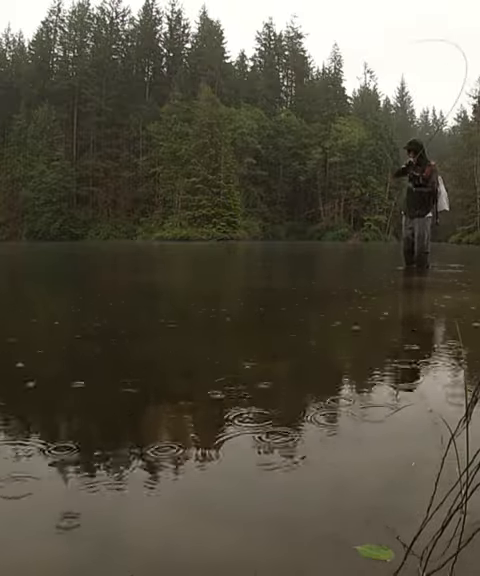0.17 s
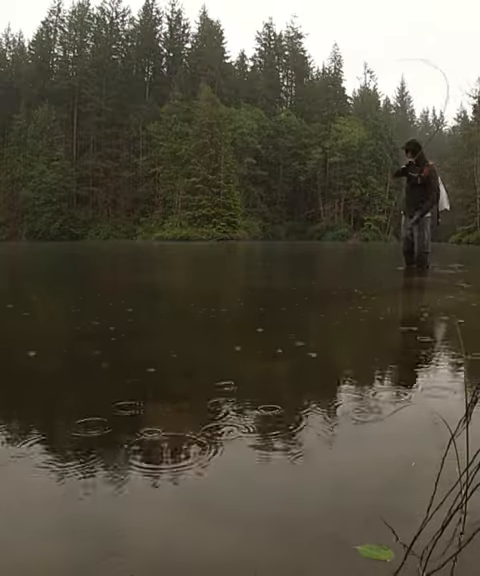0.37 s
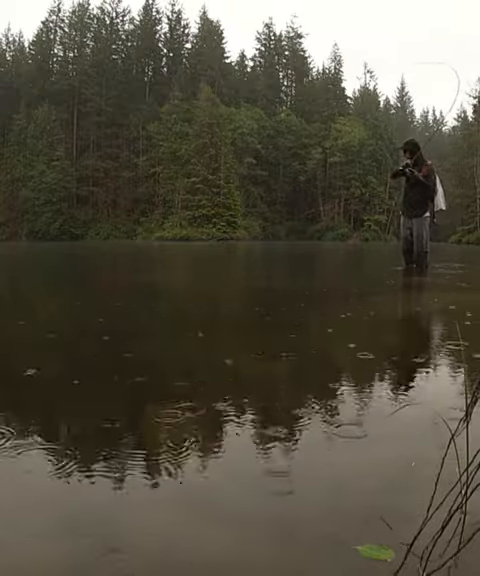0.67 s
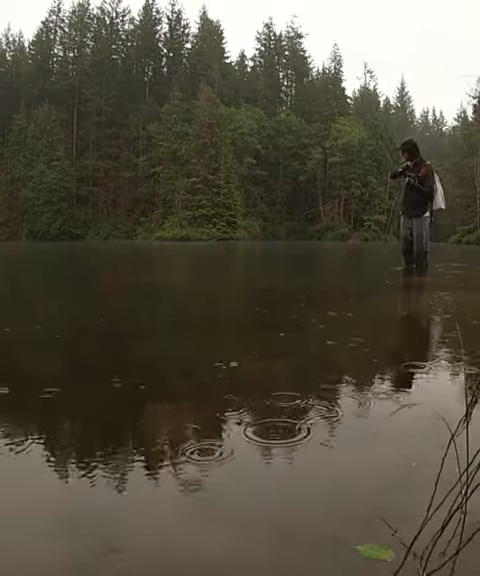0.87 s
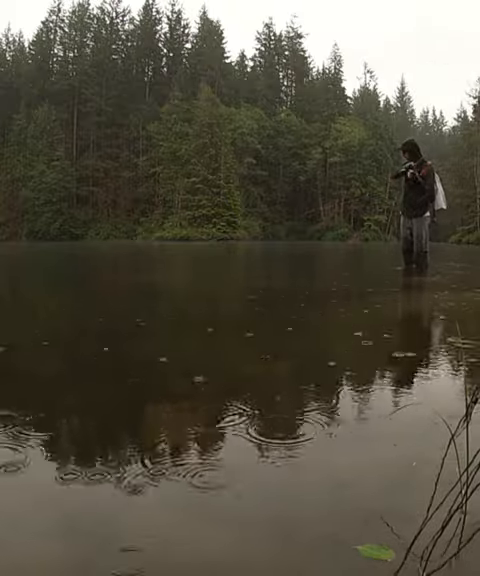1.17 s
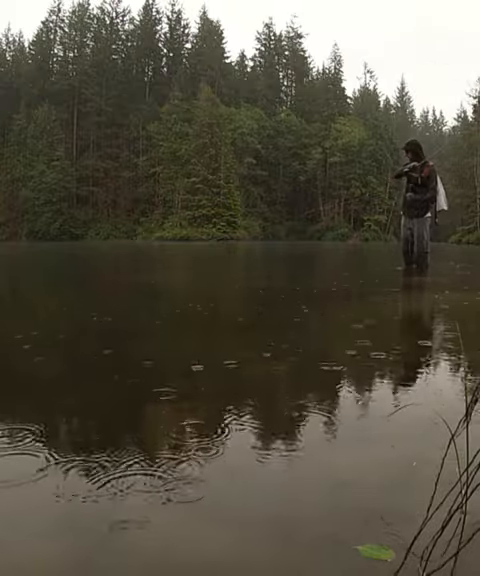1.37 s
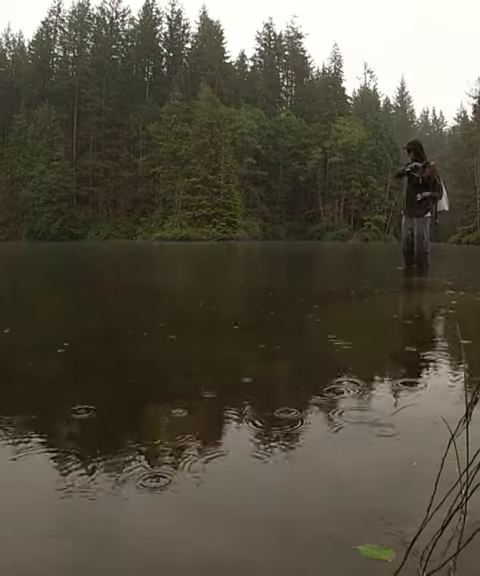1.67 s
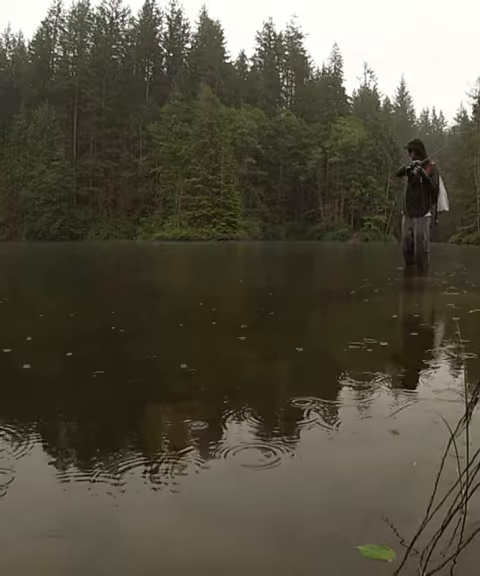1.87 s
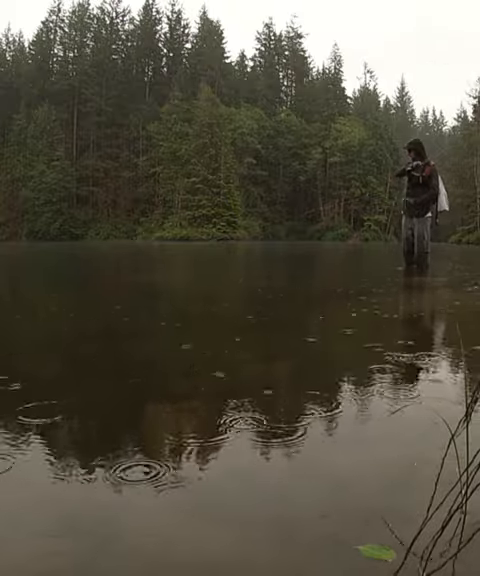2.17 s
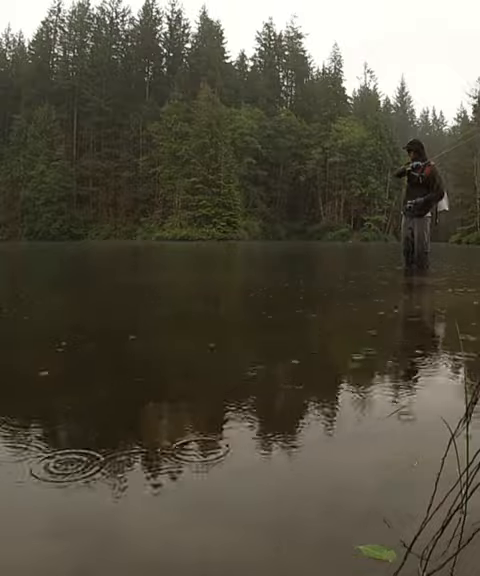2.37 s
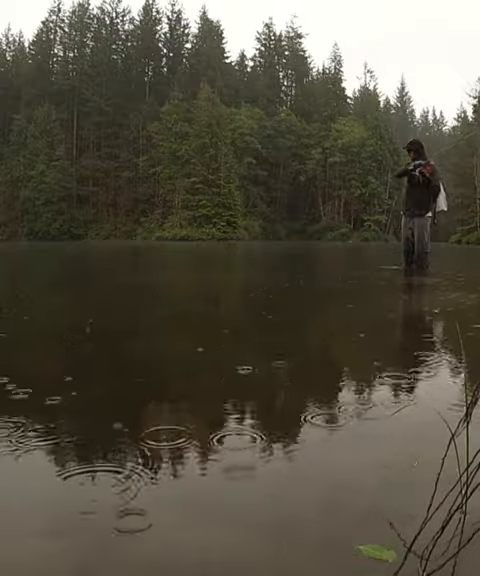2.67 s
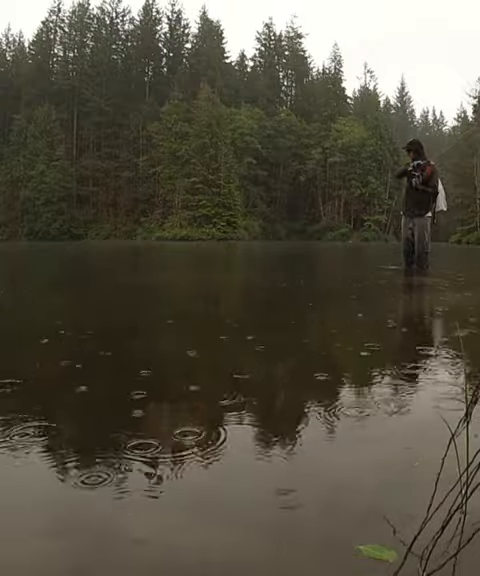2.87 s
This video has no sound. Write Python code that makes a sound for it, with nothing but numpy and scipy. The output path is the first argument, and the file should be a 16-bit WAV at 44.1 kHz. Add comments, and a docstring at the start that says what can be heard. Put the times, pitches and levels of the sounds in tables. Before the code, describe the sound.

Wet fishing line rasps and zips through rod rings in bursts beside a quiet rainy lake

```python
"""Wet fly line is pulled through the rings of a fishing rod, by a forest lake in light rain.
The line sticks and slips: each slip rings the rod, so single slips tick and quick runs creak.
As it slides it also hisses: shaped noise with narrow whistles. A songbird's gliding near-sines echo.
Below lie a rumble and far rain (noise), a faint low tone, chirping small drops and one big plop."""
import sys
import numpy as np
from scipy import signal
from scipy.io import wavfile
from scipy.ndimage import uniform_filter1d

SR = 44100
rng = np.random.default_rng(int(sys.argv[2]) if len(sys.argv) > 2 else 0)


def nominal_scale(level):
    """Amplitude ratio for a level in decibels (scalar or array-like)."""
    x = np.asarray(level, float) / 20
    return 10 ** x


def persist_wave(psi):
    """Save psi, clipped to +-1, as 16-bit WAV."""
    counts = np.round(np.clip(psi, -1, 1) * 32767).astype(np.int16)
    wavfile.write(sys.argv[1], SR, np.atleast_2d(counts).T)


N = 133623  # length in samples
USUAL_RATE = 300  # slips per second at which the rod rings at its plain pitch


def read(points, hz):
    """Reads a curve at any frequency, on a logarithmic frequency scale."""
    f, value = np.transpose(points)
    return np.interp(np.log(hz + 1), np.log(f + 1), value)


def evened(x):
    """Scales to an rms of 1."""
    return x / np.sqrt(np.mean(x ** 2) + 1e-20)


def wander(count, size):
    """A smooth random drift of rms 1; a larger size (samples) drifts more slowly."""
    return evened(uniform_filter1d(rng.standard_normal(count), size))


def add(mix, s, sound):
    """Adds a sound to the mix at s seconds, cut off at the end of the mix."""
    part = mix[..., round(s * SR):][..., :sound.shape[-1]]
    part += sound[..., :part.shape[-1]]


def noise(shape, same, patchy_db, flicker_db, size):
    """Two-channel noise of a spectrum, with drifting patches and a flicker shared by all bins."""
    frames, hz = 4 * N // size + 5, np.fft.rfftfreq(size, 1 / SR)
    a, b, c, d, patches = rng.standard_normal((frames, len(hz), 5)).T
    patches = uniform_filter1d(patches, size=8, axis=0)
    patches = evened(uniform_filter1d(patches, size=8, axis=1))
    same = np.clip(read(same, hz), -1, 1)[:, None]
    left = a + 1j * b
    right = same * left + np.sqrt(1 - same ** 2) * (c + 1j * d)
    flicker = flicker_db * rng.standard_normal(frames)
    z = np.array([left, right]) * nominal_scale(read(shape, hz)[:, None] + patchy_db * patches + flicker)
    return evened(signal.istft(z, nperseg=size, noverlap=3 * size // 4)[1][:, :N])


def tail(x, t60):
    """A diffuse echo, unrelated left and right, of energy about 1; t60 is its fade by 60 dB in s."""
    h = rng.standard_normal((2, SR)) * nominal_scale(-60 * np.arange(SR) / SR / t60)
    return signal.fftconvolve(x[None], h / np.linalg.norm(h[0]), axes=1)[:, :N]


def whistle(top_s, db, pitch, waver):
    """A near sine along its pitch curve, swelling to its loudest moment."""
    start_db, end_db = -11, -5.5  # against the loudest moment
    s, hz = np.transpose(pitch)
    t = np.arange(s[0], s[-1], 1 / SR)
    glide = uniform_filter1d(np.interp(t, s, hz), size=150)
    phase = 2 * np.pi * np.cumsum(glide * (1 + waver * wander(len(t), size=300))) / SR
    ends = np.clip(np.minimum(t - s[0], s[-1] - t) / .009, 0, 1)  # 9 ms fades
    swell_db = np.interp(t, (s[0], top_s, s[-1]), (start_db, 0, end_db))
    level = nominal_scale(db + swell_db + 2.4 * wander(len(t), size=500))
    return s[0], np.sqrt(2) * ends * level * np.sin(phase)


# how alike left and right are in the air noise: (f/Hz, likeness from 0 to 1)
AIR_LIKENESS = [(150, 0.98), (500, 0.83), (3770, 0.71), (15000, 0.53)]
# spectrum of rumble and far rain: (f/Hz, relative level/dB per Hz)
AIR_SPECTRUM = [(32, 0), (100, -8), (170, -11.5), (340, -25.5), (520, -39), (1900, -45.5), (4000, -45),
                (5600, -41), (9000, -57.5), (12200, -58.5), (15500, -72)]


def air():
    """Rumble and far rain: noise that is strongest in the bass."""
    return nominal_scale(-33) * noise(AIR_SPECTRUM, AIR_LIKENESS, patchy_db=0.85, flicker_db=2.6, size=2048)


# a faint low tone: (loudest at t/s, rms level/dB there before small drifts, pitch curve [(t/s, f/Hz)])
LOW_TONE = (0.015, -51.5, [(0, 465.7), (.45, 447.4)])


def hum():
    """One faint, slightly falling low tone with an unsteady pitch."""
    x = np.zeros(N)
    add(x, *whistle(*LOW_TONE, 0.068))
    return x


def drops():
    """Small drops as short fading chirps, each with its own pitch, loudness and place."""
    per_s, quietest_db, low_hz, high_hz = 120, -66, 3000, 9000  # quietest: before placing left or right
    x, t = np.zeros((2, N)), np.arange(400) / SR
    for when, high, size, place in rng.random((round(per_s * N / SR), 4)):
        turns = low_hz * (high_hz / low_hz) ** high * t
        chirp = np.exp(-turns / 3.0) * np.sin(2 * np.pi * turns)  # higher drops fade sooner
        level = nominal_scale(quietest_db - 4.5 * np.log(size + .03))  # a few are much louder
        add(x, when * N / SR, level * np.outer([1.5 - place, .5 + place], chirp))
    return x


# what the rod and rings ring with, before each slip varies it: (f/Hz, relative level/dB)
ROD_MODES = [(1000, -0.5), (1550, 5), (2150, 8), (2700, 1), (4250, -1.5), (5200, -5), (7200, -14.5),
             (10500, -28)]


def slip(db, bright_db, rate=USUAL_RATE, rough=1):
    """One jerk of the line rings the rod, a little differently each time."""
    t60, rise_s, bright_hz = .0045, 0.000088, 2500
    detune, spread_db = .04, 2.5  # random change of each mode's pitch (share) and level, times rough
    tighten = 0.13  # the ring rises with slip rate to this power
    t = np.arange(600) / SR
    hz, mode_db = np.transpose(ROD_MODES)[..., None]
    u, v = rough * rng.standard_normal((2, len(ROD_MODES), 1))
    tilt_db = bright_db * np.maximum(np.log2(hz / bright_hz), 0)
    pitch = hz * (rate / USUAL_RATE) ** tighten * (1 + detune * v)
    ring = nominal_scale(mode_db + spread_db * u + tilt_db) * np.sin(2 * np.pi * pitch * t)
    ring = -ring.sum(0) * nominal_scale(-60 * t / t60) * (1 - np.exp(-(t / rise_s) ** 2))
    return nominal_scale(db) * ring / abs(ring).max()


def thin(x):
    """The thin rod sheds no bass."""
    return signal.sosfilt(signal.butter(2, 950, "high", fs=SR, output="sos"), x)


# single slips: (t/s, peak level/dB before the bass cut, brightness/dB per octave)
SINGLE_SLIPS = [(0.1448, -27.5, 14), (0.1633, -28, 15), (0.1838, -19, 13.5), (0.1967, -13.5, -1),
                (.208, -9.5, 3), (.407, -25, 13.5), (0.4417, -28.5, 16), (1.3476, -22, 10),
                (1.3656, -14.5, 13), (1.5811, -13.5, 19.5), (1.5859, -11.5, 20.5), (2.3145, -12, 6),
                (2.3273, -8, 1.5), (2.836, -26.5, 14), (2.9006, -22, -9), (2.9111, -17.5, 7.5),
                (2.9183, -17, 9.5), (2.922, -19, -5), (2.942, -13.5, 6.5)]


def ticks():
    """Single slips, each a short ring of the rod."""
    x = np.zeros(N)
    for s, db, bright_db in SINGLE_SLIPS:
        add(x, s, slip(db, bright_db))
    return thin(x)


# line sliding through wet fingers: (start t/s, peak t/s, end t/s, hiss rms level/dB at the peak)
WET_SLIDES = [(0.18, 0.33, 0.435, -39), (0.835, 0.88, 0.905, -46.5), (1.35, 1.478, 1.53, -41),
              (1.498, 1.566, 1.605, -39), (1.63, 1.655, 1.7, -49.5), (2.08, 2.25, 2.34, -34),
              (2.4, 2.43, 2.45, -50), (2.9, 2.99, 3.06, -40)]
# spectrum of the hiss: (f/Hz, relative level/dB per Hz)
HISS_SPECTRUM = [(600, -15.5), (2400, -6), (4800, 1), (7700, -7.5), (9500, -29.5), (12100, -16),
                 (15000, -80)]
# narrow whistles of the slide: (middle f/Hz, rms level/dB against the hiss before drifts)
SLIDE_WHISTLES = [(4170, -13), (4850, -13)]


def slides():
    """Grainy hiss with narrow wandering whistles, swelling and fading with each slide."""
    t = np.arange(N) / SR
    # a power below 1 rounds the rise and fall
    level = sum(nominal_scale(db) * np.interp(t, s, (0, 1, 0)) ** 0.39 for *s, db in WET_SLIDES)
    x = noise(HISS_SPECTRUM, [(1, .75)], patchy_db=2.5, flicker_db=1.8, size=256)
    for hz, db in SLIDE_WHISTLES:
        turn = np.exp(2j * np.pi * np.cumsum(hz * (1 + 0.04 * wander(N, size=2500))) / SR)
        grain = wander(N, size=150) + 1j * wander(N, size=150)  # widens the tone a little
        x = x + nominal_scale(db + 5.2 * wander(N, size=500)) * (grain * turn).real
    return x * level


def count_slips(s, rate):
    """Counts slips along a run by summing the slip rate over time."""
    t = np.arange(s[0], s[-1], 1 / SR)
    return t, np.cumsum(np.interp(t, s, rate)) / SR


def slip_run(x, rows, jitter, spread_db, rough, bright_db):
    """Adds a run of slips, less even the slower they come; jitter is in slip periods."""
    s, rate, db = np.transpose(rows)
    t, turns = count_slips(s, rate)
    for when in np.interp(np.arange(turns[-1]), turns, t):
        u, v = rng.standard_normal(2)
        now = np.interp(when, s, rate)
        slow = min(USUAL_RATE / now, 2)
        level_db = np.interp(when, s, db) + slow * spread_db * v
        add(x, when + slow * jitter * u / now, slip(level_db, bright_db, now, slow * rough))


# short uneven creaks: (start t/s, length t/s, slip rate f/Hz, middle slip peak level/dB before the bass cut)
SHORT_CREAKS = [(0.2154, 0.011, 326, -15), (0.23, 0.019, 460, -25), (1.3729, .016, 260, -18),
                (1.385, .03, 400, -21.5), (1.571, 0.0091, 500, -25), (2.863, 0.032, 390, -33.5),
                (2.929, 0.01, 316, -21.5), (2.9383, 0.014, 344, -25)]


def creaks():
    """Short runs of slips, quick enough to blend into a creak."""
    x = np.zeros(N)
    for s, length, rate, db in SHORT_CREAKS:
        rows = [(s, rate, db), (s + length, rate, db)]
        slip_run(x, rows, jitter=.2, spread_db=2.5, rough=2, bright_db=5)
    return thin(x)


# bird notes: (loudest at t/s, rms level/dB there before small drifts, pitch curve [(t/s, f/Hz)])
BIRD_NOTES = [(.485, -44, [(.445, 3050), (.463, 2700), (.488, 2955), (.5, 2480)]), (.59, -43, [(.495, 2188),
              (.6, 2348), (.617, 2574), (.638, 2150)]), (.72, -47, [(.6, 2083), (.64, 2077), (.7, 2214),
              (.748, 2296)]), (1.09, -39, [(1.015, 2813), (1.04, 2950), (1.1, 2925), (1.112, 3070)]),
              (1.187, -40, [(1.06, 3162), (1.15, 3034), (1.185, 3080), (1.205, 2540)]),
              (1.17, -38, [(1.135, 2991), (1.175, 2800), (1.197, 2670)]), (1.2, -56, [(1.125, 2170),
              (1.165, 1703), (1.235, 2211)])]


def bird():
    """Clear notes, the last and low one with an octave; the forest answers with a long echo."""
    x = np.zeros(N)
    top_s, db, pitch = BIRD_NOTES[-1]
    octave = (top_s, db - 4, np.multiply(pitch, (1, 2)))
    for note in BIRD_NOTES + [octave]:
        add(x, *whistle(*note, 0.013))
    return x + nominal_scale(-6) * tail(x, 1.1)


def plop():
    """A big drop on the water: one low sine that dies away."""
    s, hz, peak_db, t60 = .522, 300, -31, .07
    x, t = np.zeros(N), np.arange(3000) / SR
    add(x, s, nominal_scale(peak_db - 60 * t / t60) * np.sin(2 * np.pi * hz * t))
    return x


# one long pull: (t/s, slip rate f/Hz, middle slip peak level/dB before the bass cut)
LONG_PULL = [(2.0685, 140, -28), (2.1, 160, -11), (2.121, 210, -10), (2.125, 430, -6), (2.168, 570, -5.5),
             (2.192, 365, -6.5), (2.232, 250, -9), (2.27, 190, -10), (2.306, 120, -12)]


def pull():
    """A long run of slips; the rod sways once per slip, wider when slips are slow."""
    x = np.zeros(N)
    slip_run(x, LONG_PULL, jitter=.03, spread_db=.8, rough=.85, bright_db=-2)
    x = thin(x)
    s, rate, db = np.transpose(LONG_PULL)
    t, turns = count_slips(s, rate)
    width = nominal_scale(np.interp(t, s, db) - 32) * (USUAL_RATE / np.interp(t, s, rate)) ** 2
    add(x, s[0], width * np.sin(2 * np.pi * turns) * np.hanning(len(t)))
    return x


def scatter(x):
    """A short echo off the water and things nearby."""
    return x + nominal_scale(-9) * tail(x, .04)


def lean_left(x):
    """Gives the left side more treble than the right."""
    lean_db, lean_hz = 3.5, 3830
    high = signal.butter(1, lean_hz, "high", fs=SR, output="sos")
    treble = signal.sosfiltfilt(high, x)
    return x + treble * (nominal_scale([[lean_db / 2], [-lean_db / 2]]) - 1)


def scene():
    """The line at the rod, with the lake around it."""
    line = scatter(ticks() + creaks() + pull()) + slides()
    return air() + hum() + drops() + lean_left(line) + bird() + plop()


def top_cut(x):
    """Nothing passes above the cut-off."""
    return signal.sosfilt(signal.butter(12, 15700, fs=SR, output="sos"), x)


def record(dry):
    """Turns the finished mix into the sound that is written out."""
    return top_cut(dry)


dry = scene()
out = record(dry)
persist_wave(out)
```